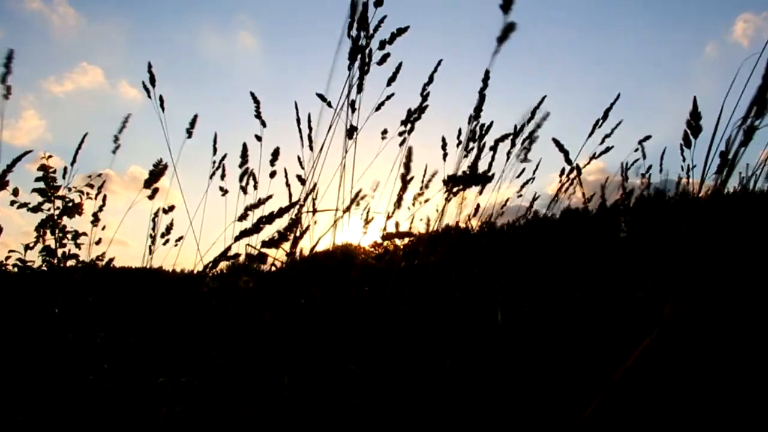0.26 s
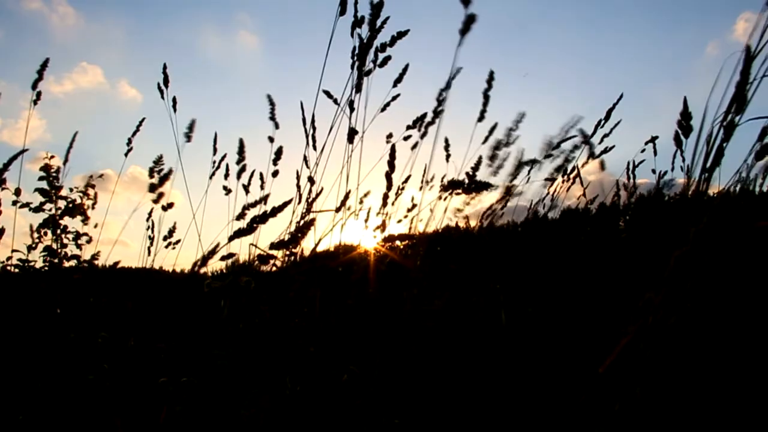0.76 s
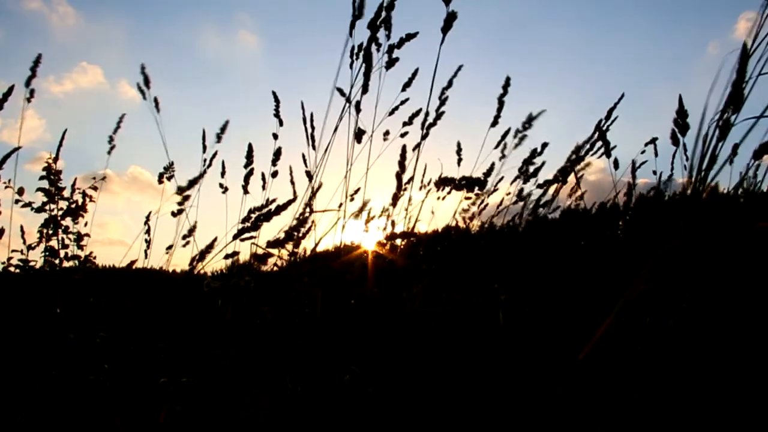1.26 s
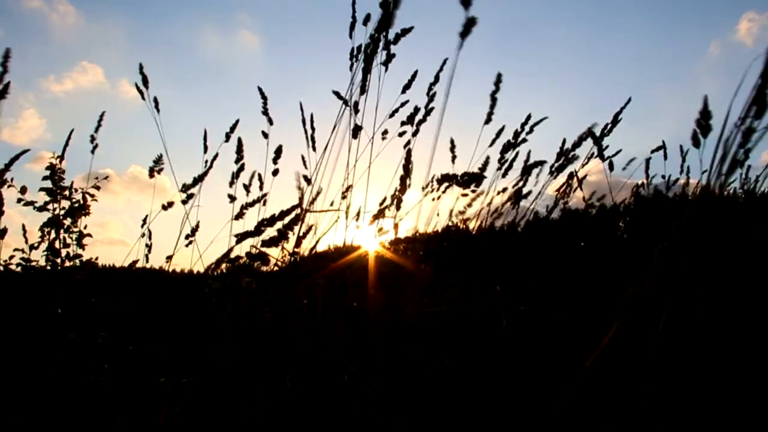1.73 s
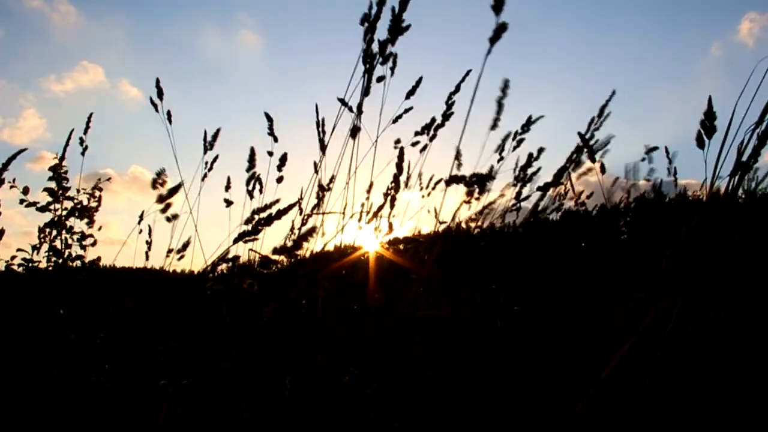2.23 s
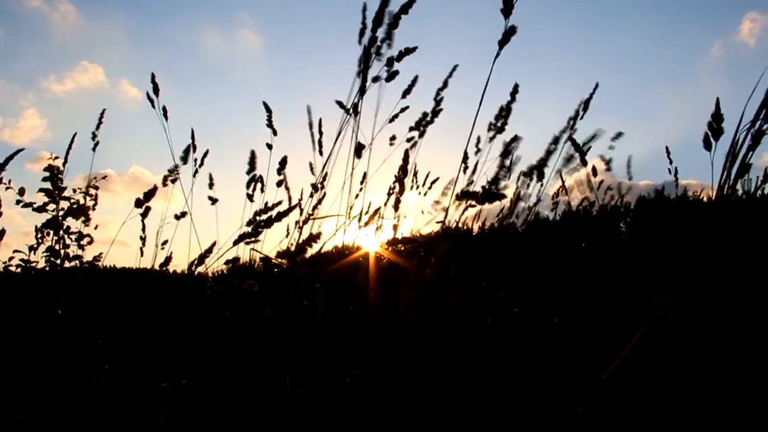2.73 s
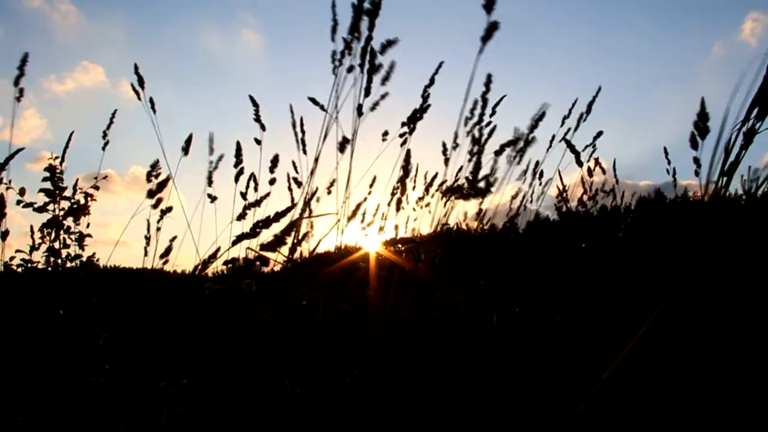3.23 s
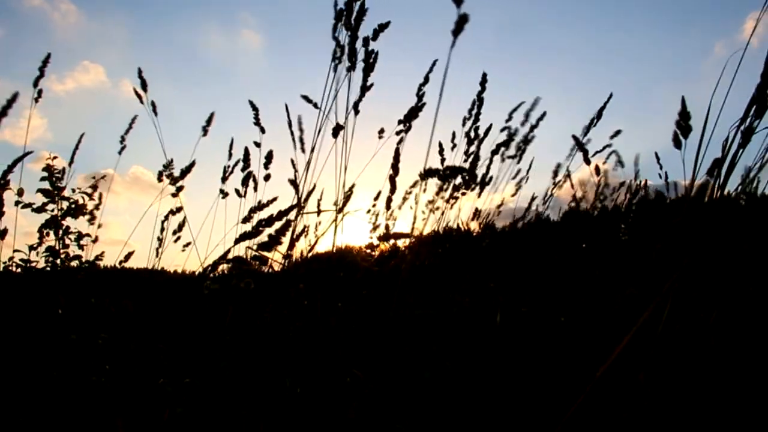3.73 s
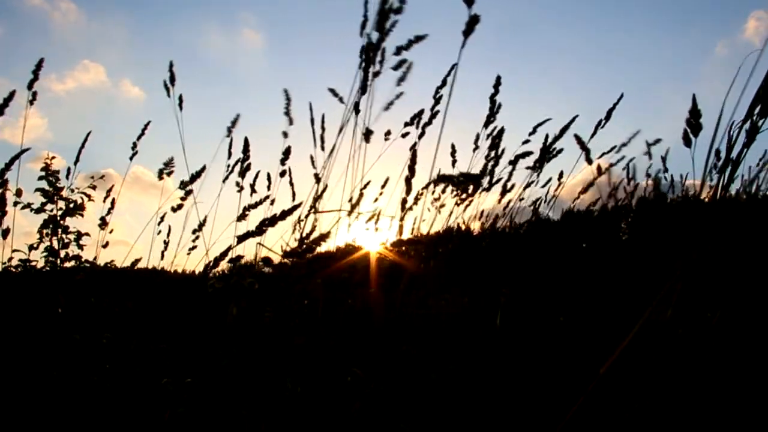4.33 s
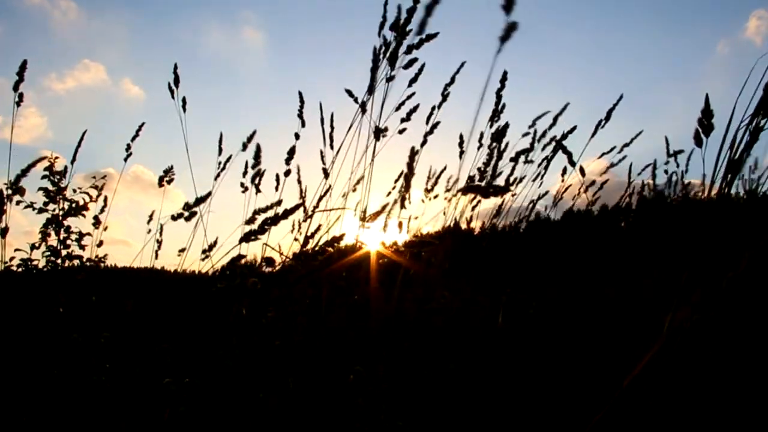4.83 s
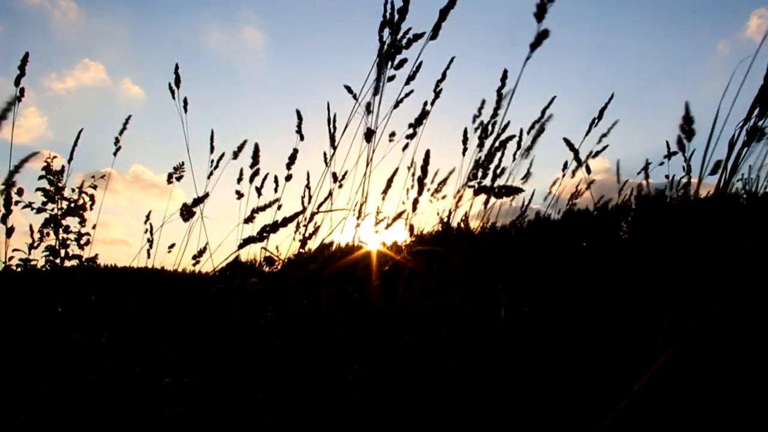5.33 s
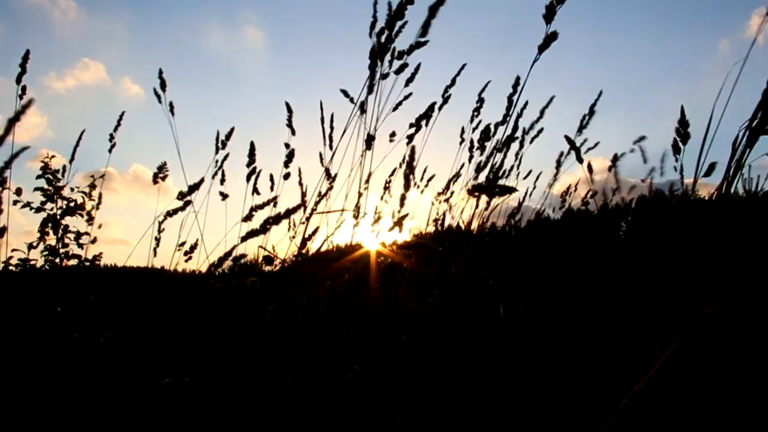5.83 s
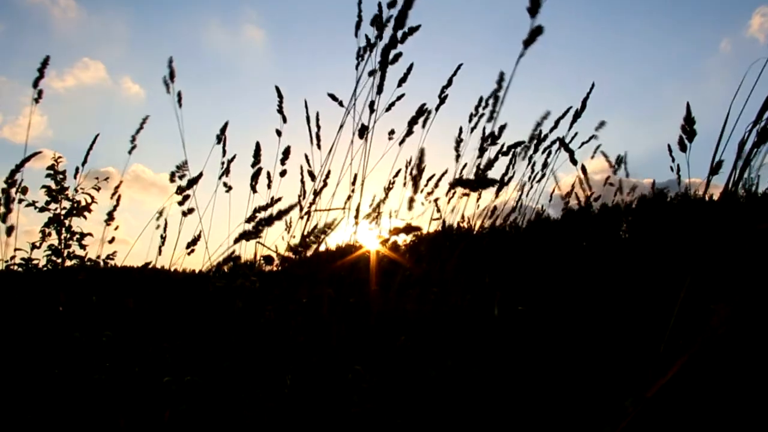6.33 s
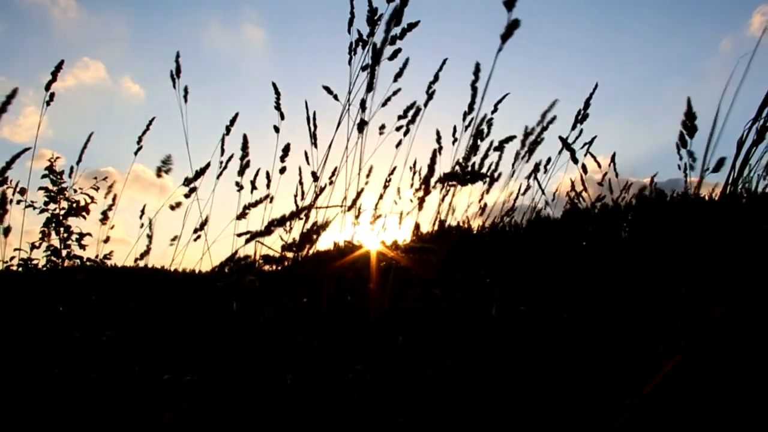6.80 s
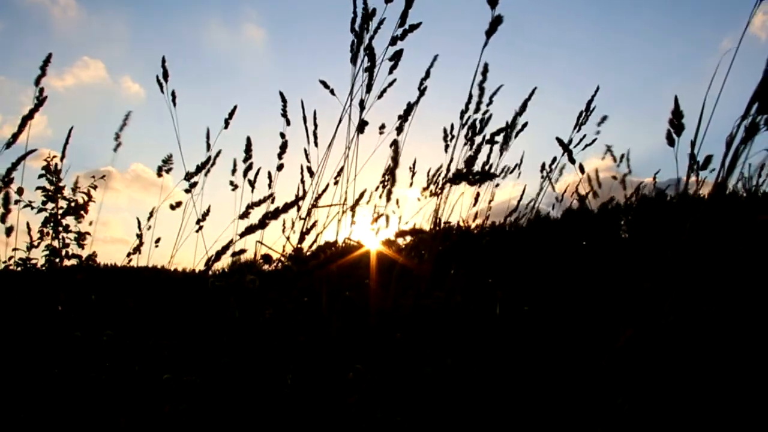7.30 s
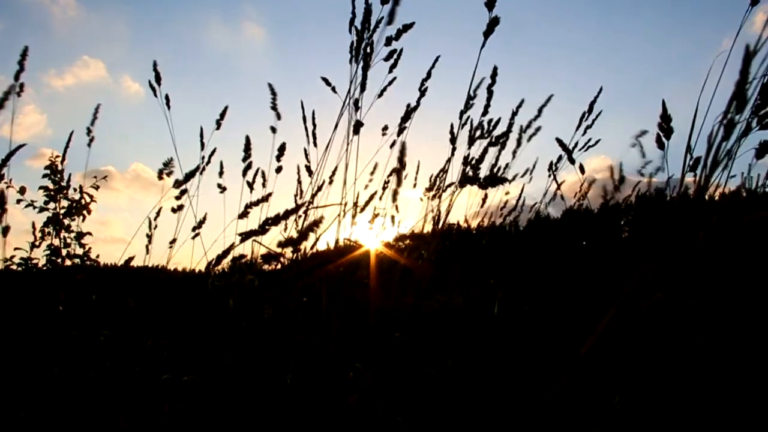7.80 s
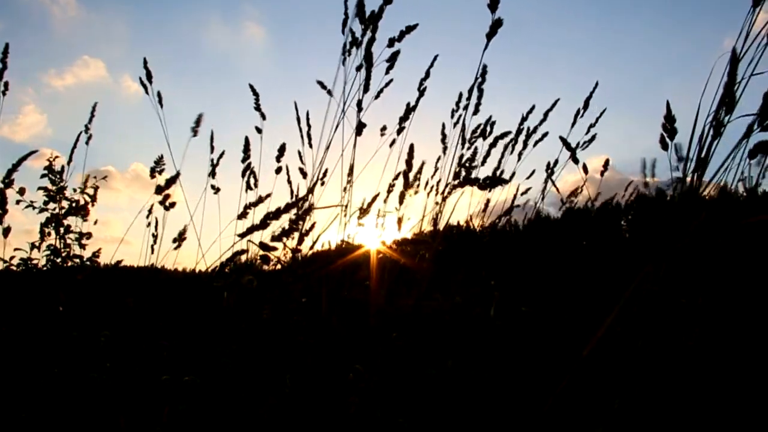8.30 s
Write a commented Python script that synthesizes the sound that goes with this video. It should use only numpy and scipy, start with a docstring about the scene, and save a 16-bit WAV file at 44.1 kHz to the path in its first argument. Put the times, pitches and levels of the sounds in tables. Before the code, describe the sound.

Several songbirds sing at the edge of a meadow over a soft hush and a low, steady rumble of breeze on the microphone. Short piping notes and thin, high whistles with a sinking trill come first. Then a near finch on the right sings a loud, falling run of trills ending in a flourish. A second finch answers from the left as a distant chorus swells and fades. A far thrush warbles throughout.

```python
"""A near finch sings one falling, trilled song on the right, at the edge of a meadow.
A second finch answers from the left; a tit, a piping bird and a far thrush sing around them.
Every voice is a gliding whistle that the trees scatter and echo. Beneath lie a distant
chorus, the hush of open land and a low rumble of moving air."""
import sys
import numpy as np
from scipy import signal
from scipy.fft import rfft, irfft
from scipy.io import wavfile
from scipy.ndimage import uniform_filter1d

SR = 44100
rng = np.random.default_rng(int(sys.argv[2]) if len(sys.argv) > 2 else 0)


def store_wav(level_fs):
    """Save 16-bit WAV to argv[1]."""
    pcm = np.round(np.clip(np.atleast_2d(level_fs), -1, 1) * 32767)
    wavfile.write(sys.argv[1], SR, pcm.T.astype(np.int16))


N = 377055
TIME = np.arange(N) / SR

# The flourish both finches sing. Each row: seconds from its anchor, pitch in Hz, level in dB.
FINCH_FLOURISH = [(-.029, 3910, 9), (-.021, 5400, -10.5), (-.006, 5600, -22), (.002, 8000, -21),
                  (.008, 4600, -4), (.025, 2750, -6.5), (.040, 4300, -5), (.048, 3300, -3.5),
                  (.075, 2550, 0)]


def undb(db):
    """Decibels to gain."""
    return 10 ** (np.asarray(db) / 20)


def sides(pan_db):
    """Left and right gains for a left-minus-right level."""
    return undb(np.array([[pan_db], [-pan_db]]) / 2)


def add(track, start, sound):
    """Mix a sound into a track at a time in seconds."""
    i = int(round(start * SR))
    lo, hi = max(i, 0), min(i + len(sound), N)
    if hi > lo:
        track[lo:hi] += sound[lo - i:hi - i]


def drift(rate):
    """A random wander that turns about rate times a second."""
    return np.interp(TIME * rate, np.arange(N // 16), rng.standard_normal(N // 16))


def noise(spectrum, likeness, band_hz):
    """Coloured stereo noise, rms 1 inside a band; likeness pairs Hz with the share both sides hear."""
    hz = np.maximum(np.arange(N // 2 + 1) * SR / N, 1)
    points_hz, points_db = np.transpose(spectrum)
    gain = undb(np.interp(np.log(hz), np.log(points_hz), points_db))
    gain /= np.sqrt(np.mean(gain ** 2 * ((hz > band_hz[0]) & (hz < band_hz[1]))))
    share = np.interp(hz, *np.transpose(likeness))
    common, *apart = rfft(rng.standard_normal((3, N)))
    return irfft(gain * (np.sqrt(share) * common + np.sqrt(1 - share) * np.array(apart)), N)


def land(level_db=-51, sway_db=.25):
    """The even hush of open country, wider in the highs than in the lows."""
    # The colour of the hush. Each row: frequency in Hz, relative density in dB.
    colour = [(59, -25), (100, -7), (153, -6.5), (477, -5), (1430, -15), (1760, -12.5), (2220, -7),
              (2580, -29), (2990, -11), (4100, -9.5), (4560, -10.5), (6120, -21.5), (13700, -25),
              (15500, -35)]
    hush = noise(colour, likeness=[(100, .45), (300, .6), (700, .25), (1500, .15)], band_hz=(200, 1200))
    return hush * undb(level_db + sway_db * drift(1.7)) * sides(-1)


def breeze(level_db=-26, gust_db=.34, gusts_per_s=1.63):
    """Slow eddies rumble on each microphone almost separately and swell in light gusts."""
    # The colour of the rumble. Each row: frequency in Hz, relative density in dB.
    colour = [(8, -4), (16, 1.5), (24, 6), (32, -4), (45, -13), (90, -29.5), (140, -39.5), (300, -58.5)]
    eddies = noise(colour, likeness=[(20, .1), (100, .2)], band_hz=(15, 70))
    return eddies * undb(level_db - gust_db * drift(gusts_per_s)) * sides(.1)


def syrinx(hz, gain, waver=.0078, flutter_db=3.5, hiss=.044, second_db=-35, third_db=-39):
    """A nearly pure, unsteady whistle with faint overtones and a faint band of hiss around its pitch."""
    i = np.arange(len(hz))
    wobble, flutter, fast_noise = (np.interp(i / step, np.arange(4096), rng.standard_normal(4096))
                                   for step in (128, 128, 9))
    phase = 2 * np.pi * np.cumsum(hz * (1 + waver * wobble)) / SR
    overtones = undb(second_db) * np.sin(2 * phase) + undb(third_db) * np.sin(3 * phase) * (hz < SR / 6)
    return (np.sin(phase) + overtones) * gain * undb(flutter_db * flutter) * (1 + hiss * fast_noise)


def notes(rows, taper=.25, throb=0., **voice):
    """Whistles arched through three pitches; in a buzz the pitch swings and the level throbs with it."""
    track = np.zeros(N)
    for start, length, first_hz, middle_hz, last_hz, db, *vibrato in rows:
        swing_hz, swings_per_s = vibrato or (0, 0)
        t = np.arange(int(length * SR)) / SR
        arch = np.polyval(np.polyfit([0, .5, 1], [first_hz, middle_hz, last_hz], 2), t / length)
        cycle = 2 * np.pi * swings_per_s * t
        gain = undb(db) * signal.windows.tukey(len(t), taper) * (1 + throb * np.cos(cycle))
        add(track, start, syrinx(arch + swing_hz * np.sin(cycle), gain, **voice))
    return track


def trill(start_s, period_s, count, db, sharp=0, settle=1, slowing_s=0):
    """Rows of seconds, dB and pitch factor: the level ramps, a sharp start settles, the pace may slow."""
    k = np.arange(count)
    times = start_s + period_s * k + slowing_s * k * (k - 1) / 2
    return np.column_stack([times, np.linspace(*db, count), 1 + sharp * np.exp(-k / settle)])


def syllables(shape, rows):
    """One learned gesture, sung at each row of seconds, dB and optional pitch factor."""
    s, hz, db = np.transpose(shape)
    t = np.arange(s[0], s[-1], 1 / SR)
    pitch = uniform_filter1d(np.interp(t, s, hz), size=90)
    gain = undb(np.interp(t, s, db)) * signal.windows.tukey(len(t), .12)
    track = np.zeros(N)
    for anchor, level_db, *factor in rows:
        add(track, anchor + s[0], syrinx(pitch * np.prod(factor), gain * undb(level_db)))
    return track


def perch(song, pan_db, direct_db, near_db, wood_db, t60=1.3, build_s=.0025, scatter_s=.025):
    """A song arrives directly, scattered by nearby leaves and trunks, and as the wood's long echo."""
    t = TIME[:2 * SR]
    scatter, echo = rng.standard_normal((2, 2, len(t)))
    scatter = scatter * np.abs(scatter) * np.exp(-t / scatter_s) * (t > .002)
    echo = echo * (1 - np.exp(-t / build_s)) * undb(-60 * t / t60)
    scatter, echo = (r / np.linalg.norm(r, axis=1, keepdims=True) for r in (scatter, echo))
    response = undb(near_db) * sides(pan_db / 2) * scatter + undb(wood_db) * sides(1.1) * echo
    reflected = signal.fftconvolve(song[None], response, axes=1)[:, :N]
    return undb(direct_db) * sides(pan_db) * song + reflected


def chorus(count=800, low_hz=2100, high_hz=4200, glide=.2, spread_db=3, level_db=-49.5, swell_db=18.5):
    """Far chirps melt into a murmur that swells once, in answer to the near finch."""
    chirps = []
    for when, length, pitch, *chances in rng.random((count, 6)):
        hz = low_hz * (high_hz / low_hz) ** pitch
        bend_in, bend_out, strength = 2 * np.array(chances) - 1
        arch_hz = hz * (1 + glide * bend_in), hz, hz * (1 + glide * bend_out)
        chirps.append((when * N / SR, .029 + .0635 * length, *arch_hz, spread_db * strength))
    murmur = perch(notes(chirps), pan_db=2, direct_db=-10, near_db=-5, wood_db=0)
    start_s, attack_s, hold_s, release_s = 5.33, .85, 1.13, 1.4
    swell = np.interp(TIME, np.cumsum([start_s, attack_s, hold_s, release_s]), [0, 1, 1, 0])
    return murmur / murmur.std() * undb(level_db + swell_db * swell)


def twitters(count=30, hz=4400, spread_hz=700, length_s=.069, glide_hz=350, db=-53):
    """Now and then a faint high note carries over from a far bird."""
    rows = []
    for when, pitch, slope in rng.random((count, 3)):
        middle = hz + spread_hz * (2 * pitch - 1)
        fall = glide_hz * (2 * slope - 1)
        rows.append((when * N / SR, length_s, middle + fall, middle, middle - fall, db))
    return perch(notes(rows), pan_db=0, direct_db=-4, near_db=-3, wood_db=-2)


def thrush(warble_depth=.061, swings_per_s=42):
    """Low fluting, warbling and hooting from deep in the wood, mostly echo."""
    # Fluted and warbled notes. Each row: start and length in seconds, first and last Hz, level in dB.
    fluted = [(0, 0.094, 2076, 1970, -41.5), (.370, 0.22, 1775, 1832, -47.5), (.850, .61, 1916, 2056, -50),
              (1.730, 0.3, 2680, 2737, -47.5), (1.980, .23, 2104, 2020, -49.5),
              (7.000, .35, 1760, 1650, -54), (7.130, 0.244, 2173, 2127, -40),
              (8.460, 0.073, 2575, 2648, -35), (8.522, 0.052, 1630, 2280, -33)]
    warbled = [(0, .29, 2617, 2480, -33.5), (1.403, .28, 1809, 1642, -47.5), (2.644, 0.14, 2550, 2134, -34),
               (2.770, .22, 2450, 2350, -36.5), (3.000, .13, 2423, 2130, -36),
               (3.230, 0.2, 2940, 3000, -43.5), (3.399, .15, 2610, 2142, -37.5),
               (4.237, .092, 2520, 3554, -27.5), (4.874, 0.16, 2410, 3230, -31),
               (6.402, 0.074, 2377, 1733, -35.5), (7.920, .089, 3290, 2320, -34.5)]
    # One hoot. Each row: seconds from its start, pitch in Hz, level in dB.
    hoot = [(0, 2380, -3), (.020, 2475, 1), (.052, 2260, -3)]
    # Runs of hoots. Each row: start and period in seconds, number of hoots.
    hoot_runs = [(3.983, .095, 3), (4.664, .085, 2)]
    flutes = [(s, length, first, (first + last) / 2, last, db) for s, length, first, last, db in fluted]
    warbles = [(s, length, first, (first + last) / 2, last, db, warble_depth * first, swings_per_s)
               for s, length, first, last, db in warbled]
    hoots = sum(syllables(hoot, trill(*run, db=(-28.5, -30.5))) for run in hoot_runs)
    song = notes(flutes, taper=.18) + hoots + notes(warbles, taper=.049, throb=.18)
    return perch(song, pan_db=1, direct_db=-10, near_db=-2.5, wood_db=-2, t60=2.77)


def rival_finch(swing_hz=345, swings_per_s=140):
    """From the left: faint ticks, loose buzzes and whistles, and a late, slowing trill and flourish."""
    # Two syllables. Each row: seconds from the anchor, pitch in Hz, level in dB.
    tick = [(0, 5230, -8), (.016, 4800, -5), (.033, 4200, 4)]
    flick = [(-.056, 4500, -12), (-.043, 3850, -3), (-.030, 3400, -11), (-.022, 3000, -22),
             (-.012, 3250, -3), (-.003, 3700, 1), (.002, 4750, -5), (.010, 3300, -8)]
    # Loose notes. Each row: start and length in seconds, first, middle and last Hz, level in dB.
    buzz_notes = [(0.869, 0.017, 4900, 4200, 3670, -33.5), (6.675, 0.11, 5380, 5350, 4540, -39.5),
                  (7.513, .115, 3300, 4005, 3600, -28.5)]
    whistles = [(2.650, 0.12, 4960, 4890, 4730, -52.5), (3.555, 0.13, 6100, 6410, 5220, -58.5),
                (5.970, 0.036, 4290, 4410, 5250, -30), (6.020, 0.033, 4660, 4680, 4900, -30.5),
                (6.620, 0.026, 4660, 5160, 5900, -39), (7.645, .13, 2100, 3373, 1690, -35.5)]
    ticks = trill(start_s=.06, period_s=.13, count=4, db=(-47, -51))
    flicks = trill(start_s=6.448, period_s=.1055, count=8, db=(-25.5, -29.5),
                   sharp=.09, settle=4.07, slowing_s=.0054)
    buzzes = [(*row, swing_hz, swings_per_s) for row in buzz_notes]
    song = syllables(tick, ticks) + syllables(flick, flicks)
    song += syllables(FINCH_FLOURISH, [(7.412, -29, 1.15)])
    song += notes(buzzes, taper=.7, throb=.41) + notes(whistles, taper=.17, waver=.018)
    return perch(song, pan_db=3, direct_db=0, near_db=-4, wood_db=-4)


def tit(trill_hz=5350, end_hz=4450, bend_hz_per_s2=390000, again_s=6.945, again_db=-4, trim_db=-2.5):
    """Thin arches and a slide run into a sinking trill and a level note; the song restarts, softer."""
    # The opening arches. Each row: crest in seconds, crest in Hz, rise and fall in seconds, level in dB.
    opening = [(0.701, 6800, .075, 0.087, -41), (.848, 6486, .045, 0.057, -30),
               (.940, 6170, .012, 0.06, -32.5), (1.408, 6370, .018, 0.084, -32)]
    # The long downward slide. Each row: seconds from its start, pitch in Hz, level in dB.
    slide = [(0, 8200, -2), (.017, 6854, -7), (.060, 6365, -1), (.122, 5650, -1.5), (.150, 4900, -2),
             (.195, 4050, -9)]
    run = trill(start_s=1.575, period_s=.093, count=8, db=(-29.5, -43.5), sharp=.2, settle=4.5)
    trill_arches = [(s, trill_hz * factor, .014, .061, db) for s, db, factor in run]
    arches = []
    for crest, hz, rise, fall, db in opening + trill_arches:
        from_crest_s = np.array([rise, (fall - rise) / 2, fall])
        arch_hz = hz - bend_hz_per_s2 * from_crest_s ** 2
        arches.append((crest - rise, rise + fall, *arch_hz, db))
    hooks = [(s + .034, .026, 5500, 4950, 4300, -39) for s, _, _ in run]  # each trill note hooks down
    last_note = [(2.31, .165, end_hz, end_hz, end_hz, -39)]
    phrase = notes(last_note + arches + hooks, taper=.37, waver=.0127) + syllables(slide, [(1.1, -29.5)])
    song = phrase.copy()
    add(song, again_s, phrase * undb(again_db))
    return perch(song, pan_db=3, direct_db=-6, near_db=-2, wood_db=-1) * undb(trim_db)


def piper():
    """A bird pipes short, level whistles at uneven intervals."""
    # One pipe. Each row: seconds from its anchor, pitch in Hz, level in dB.
    pipe = [(-.024, 3920, -32), (-.006, 4194, 3), (.015, 4208, 0), (.035, 4150, -3), (.055, 3970, -16)]
    # The calls. Each row: anchor in seconds, level in dB, pitch factor.
    calls = [(0.659, -31.5, 0.99), (.958, -41, 0.96), (1.115, -38.5, 0.99), (1.326, -39, 1.01),
             (1.585, -37.5, 1), (1.880, -36, .99), (2.246, -34.5, .97), (2.935, -44, 0.99),
             (3.765, -44, 0.99)]
    return perch(syllables(pipe, calls), pan_db=-2, direct_db=-3, near_db=-5, wood_db=-3, t60=1.2)


def near_finch():
    """Four trills, each lower than the last, and a closing flourish; the high notes beam to the right."""
    # One syllable for each trill. Each row: seconds from the anchor, pitch in Hz, level in dB.
    peak = [(-.016, 3900, -5), (-.010, 4400, -0.5), (-.004, 5136, -4.5), (0, 6140, -17), (.004, 5100, -3.5),
            (.010, 4570, -3), (.020, 4710, -11)]
    dip = [(-.018, 4345, -19), (-.010, 3950, 4.5), (-.003, 3850, 2.5), (0, 3150, -17), (.003, 4160, 6),
           (.007, 4680, 0.5), (.012, 4264, 2.5), (.017, 4450, -30)]
    scoop = [(-.032, 3935, 0), (-.024, 3252, 3), (-.009, 2885, 3.5), (0, 2338, -5), (.007, 3050, -3),
             (.023, 3275, 4.5), (.032, 3320, -11)]
    slur = [(-.002, 3744, -2), (.003, 3375, -1), (.010, 2622, -11), (.018, 2307, -11), (.032, 2230, -13),
            (.039, 1813, -29)]
    peaks = trill(start_s=4.034, period_s=.1267, count=5, db=(-29.5, -17))
    dips = trill(start_s=4.628, period_s=.0732, count=6, db=(-21.5, -21.5))
    scoop_rhythm = dict(start_s=5.146, period_s=.1905, count=4)
    scoops = trill(**scoop_rhythm, db=(-24.5, -23.5), sharp=.085, settle=.612)
    slurs = trill(start_s=5.804, period_s=.0893, count=5, db=(-16, -22.5))
    # A high lisp leads into each peak, a downward snap splits each dip,
    # a buzz leads into each scoop and an upward flick starts each slur.
    lisps = [(s - .051, .029, 5800, 6500, 7000, db - 15.5, 620, 210) for s, db, _ in peaks]
    snaps = [(s - .004, .007, 7400, 4600, 2600, db - 17) for s, db, _ in dips]
    buzz_hz, swing_hz, swings_per_s = np.array([3800, 4180, 3850]), 355, 185
    buzzes = [(s - .098, .0785, *(factor * buzz_hz), db, swing_hz, swings_per_s)
              for s, db, factor in trill(**scoop_rhythm, db=(-18.5, -22.5), sharp=.1, settle=.488)]
    flicks = [(s - .012, .009, 3400, 4400, 5300, db - 17) for s, db, _ in slurs]
    high = syllables(peak, peaks) + syllables(dip, dips) + notes(lisps + snaps, taper=.36, throb=.34)
    high += notes(buzzes, taper=.7, throb=.54, waver=.017, hiss=.081)
    low = syllables(scoop, scoops) + syllables(slur, slurs)
    low += syllables(FINCH_FLOURISH, [(6.299, -22)]) + notes(flicks)
    return (perch(high, pan_db=-13.5, direct_db=-1.5, near_db=-6, wood_db=-5.5, t60=1.5)
            + perch(low, pan_db=-8, direct_db=1, near_db=-.5, wood_db=1, t60=1.5))


def scene():
    """All the birds over the hush and the breeze."""
    birds = near_finch() + rival_finch() + tit() + piper() + thrush() + chorus() + twitters()
    return birds + land() + breeze()


def record(dry, top_hz=15750):
    """The sound fades in and out within a few milliseconds; a steep low-pass cuts the top."""
    fade = signal.windows.tukey(N, .002)
    return signal.sosfilt(signal.ellip(10, .1, 80, top_hz, fs=SR, output="sos"), dry * fade)


dry = scene()
out = record(dry)
store_wav(out)
```